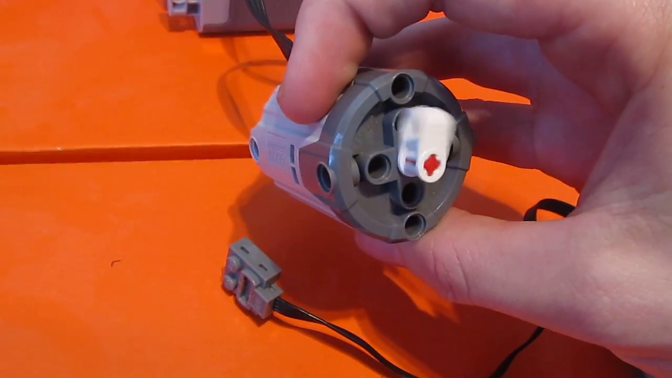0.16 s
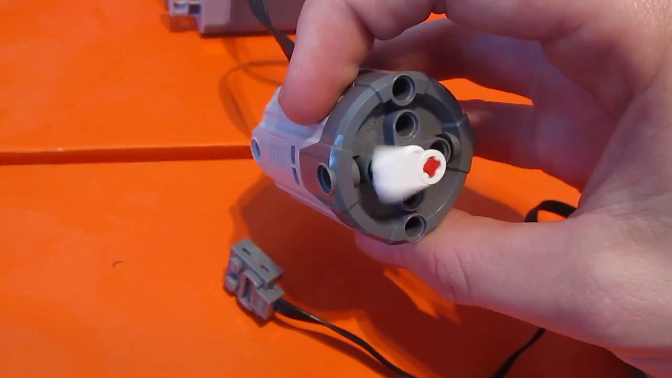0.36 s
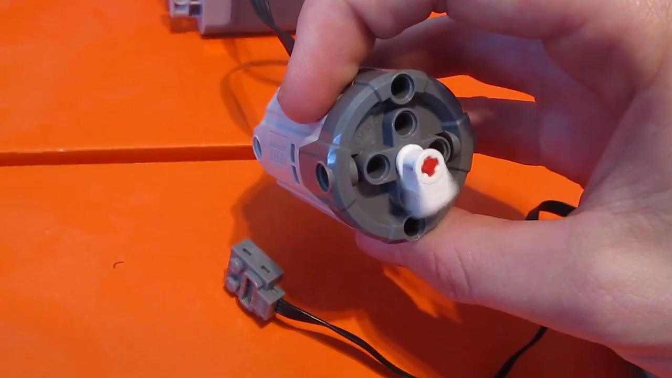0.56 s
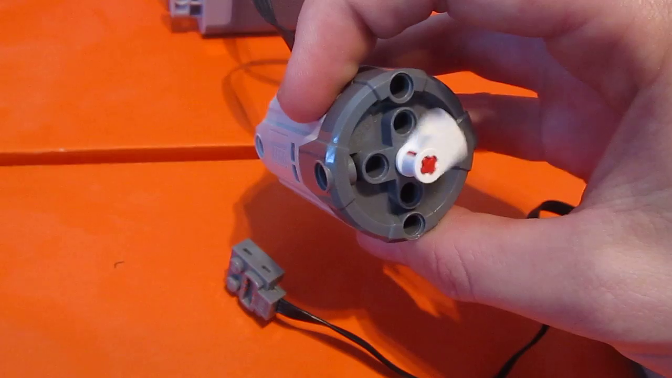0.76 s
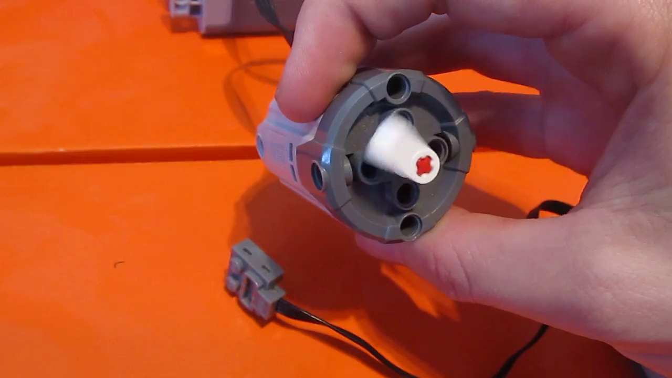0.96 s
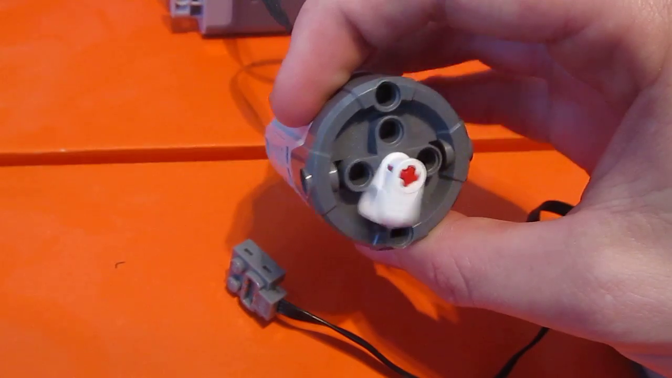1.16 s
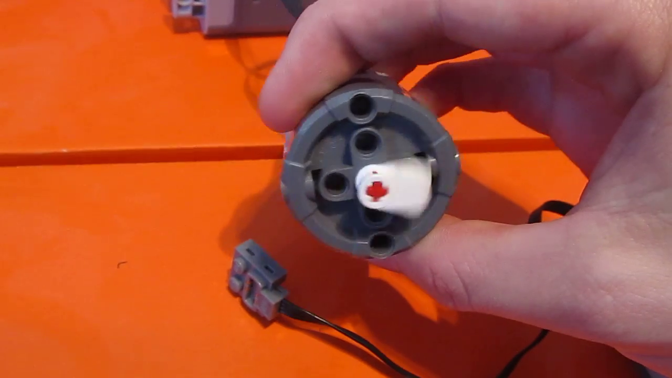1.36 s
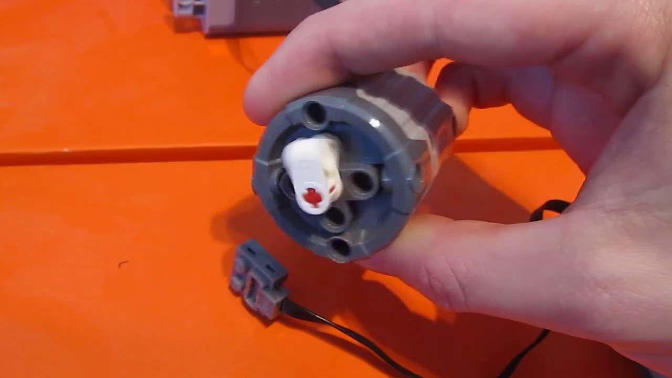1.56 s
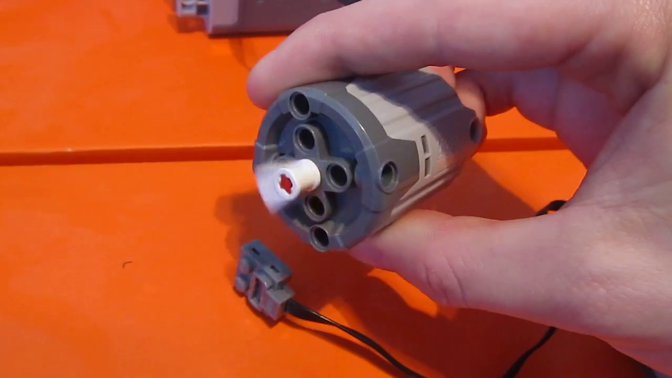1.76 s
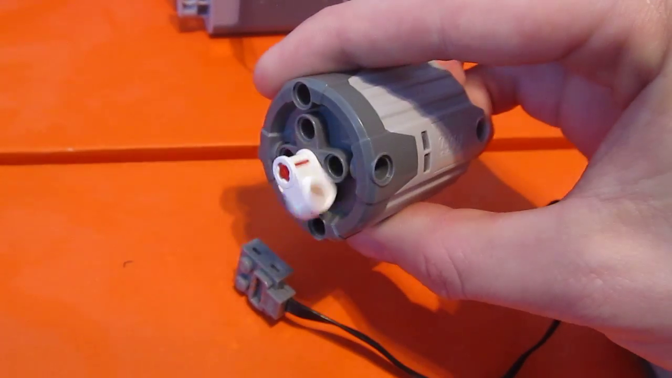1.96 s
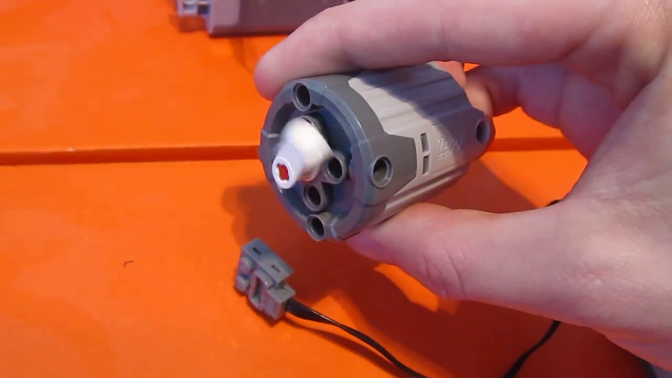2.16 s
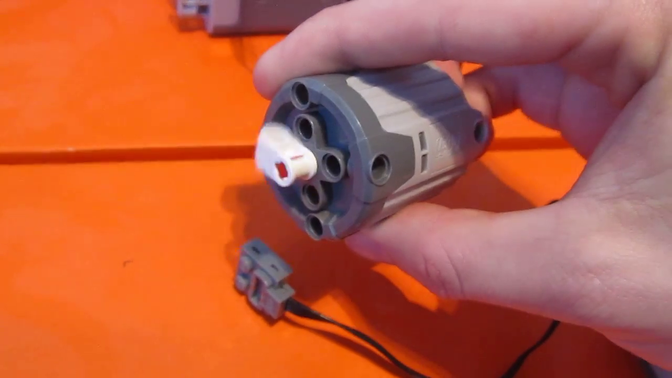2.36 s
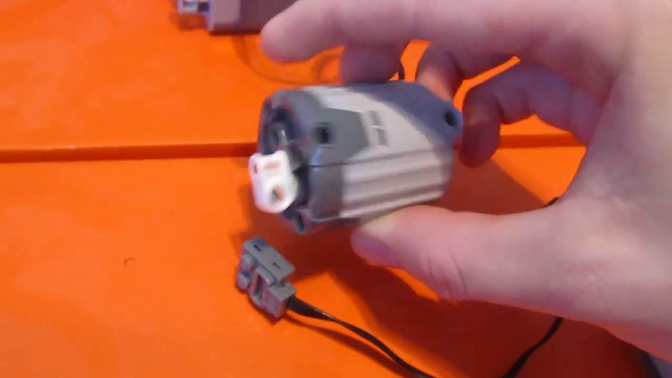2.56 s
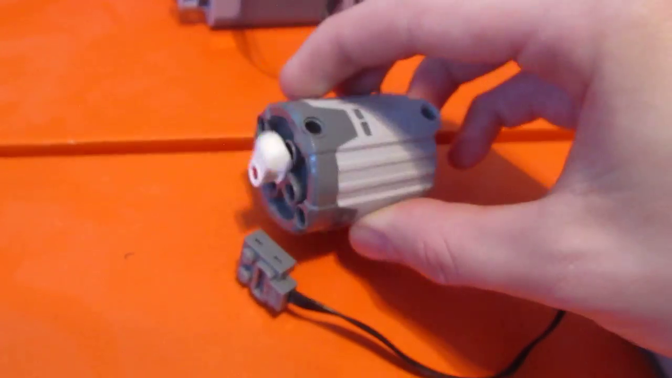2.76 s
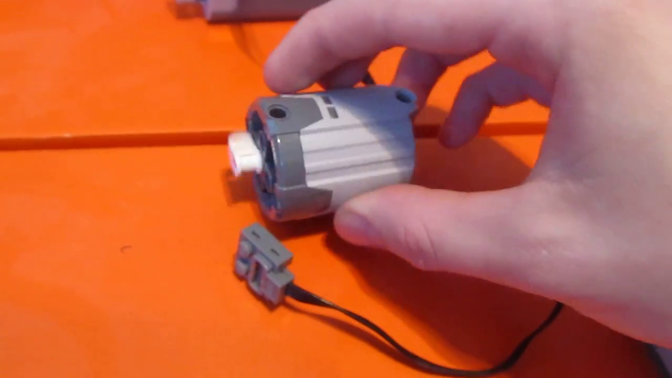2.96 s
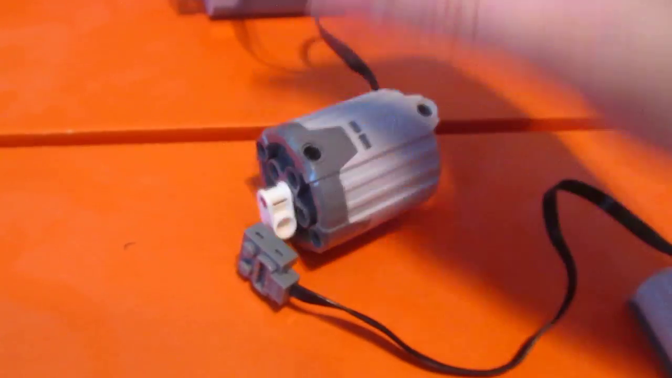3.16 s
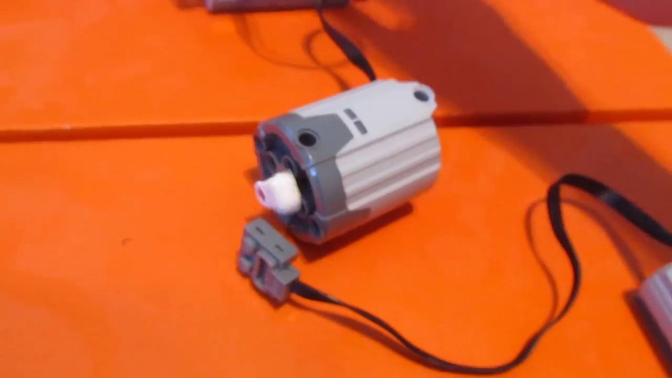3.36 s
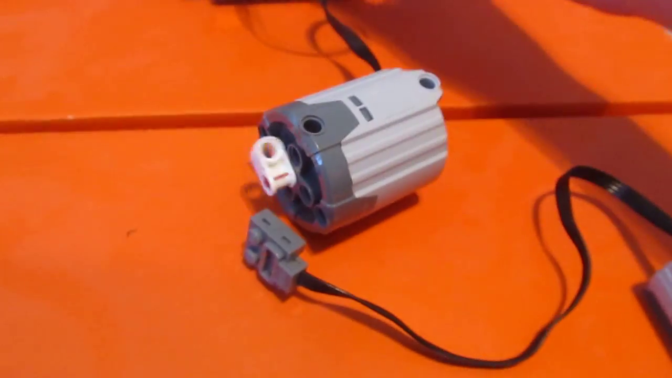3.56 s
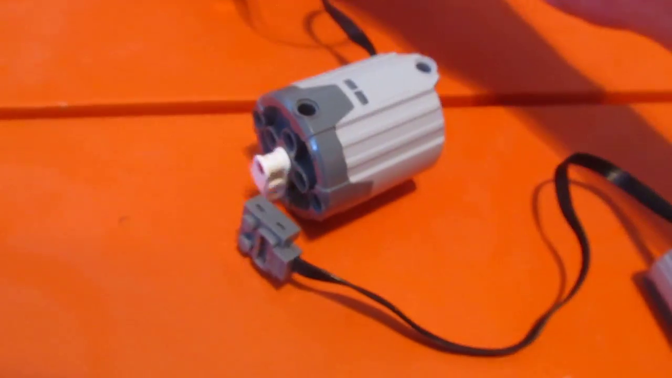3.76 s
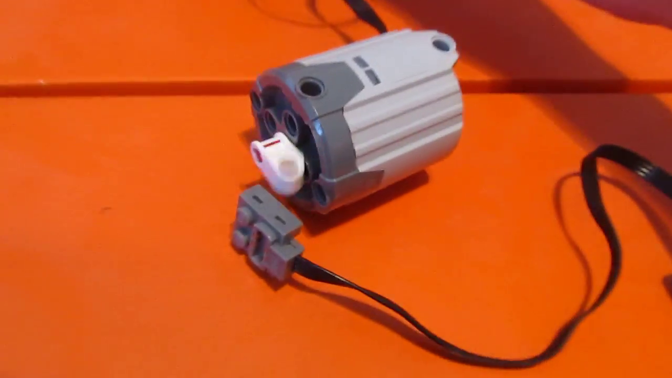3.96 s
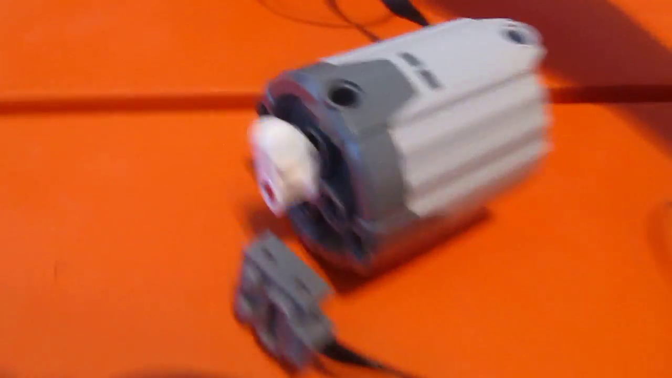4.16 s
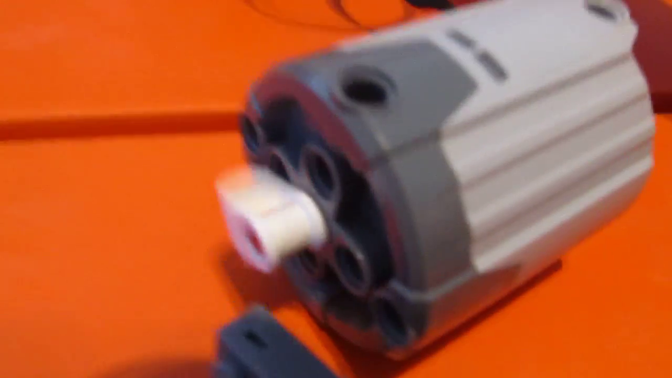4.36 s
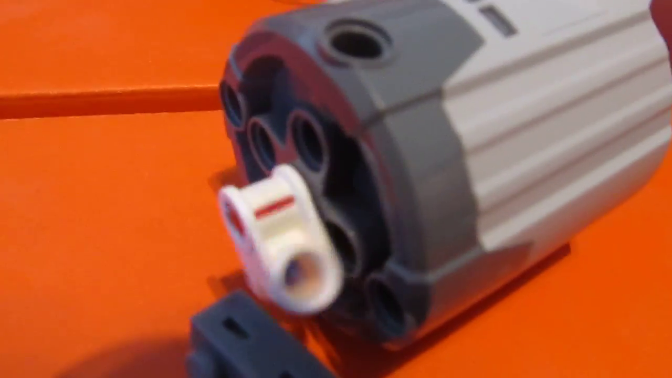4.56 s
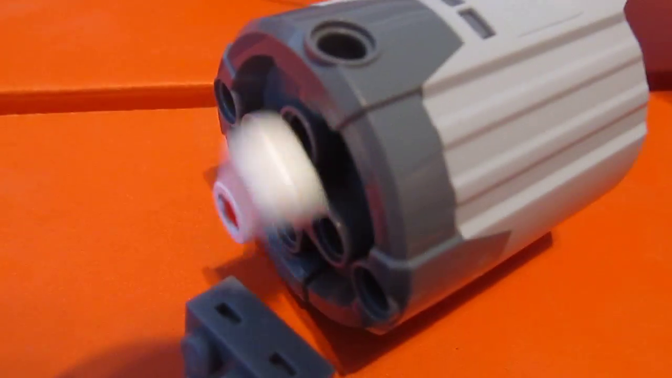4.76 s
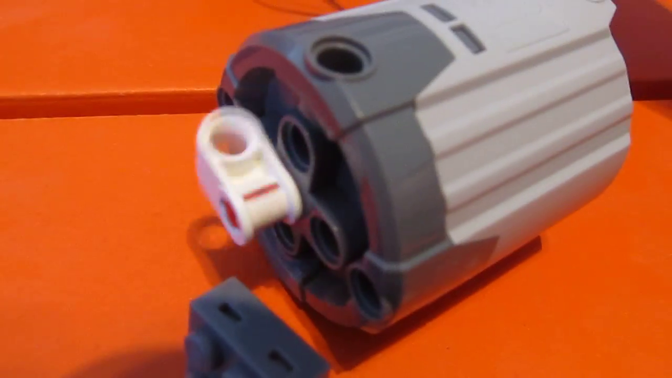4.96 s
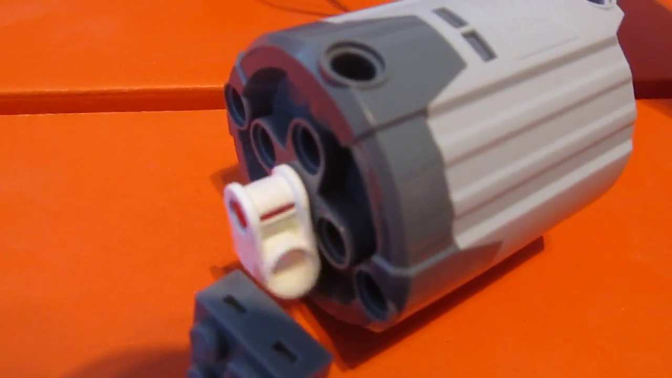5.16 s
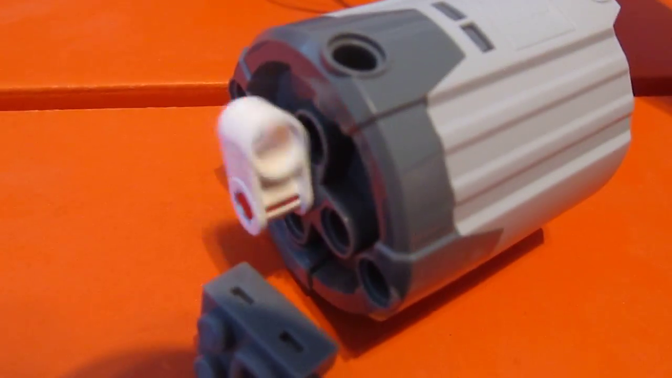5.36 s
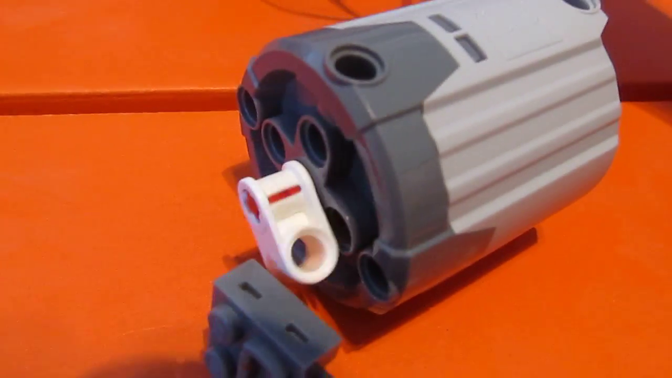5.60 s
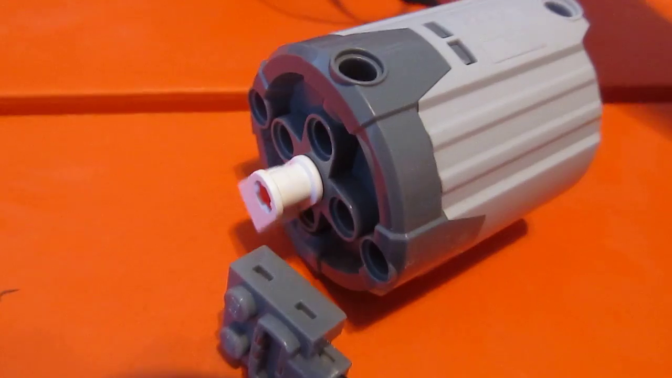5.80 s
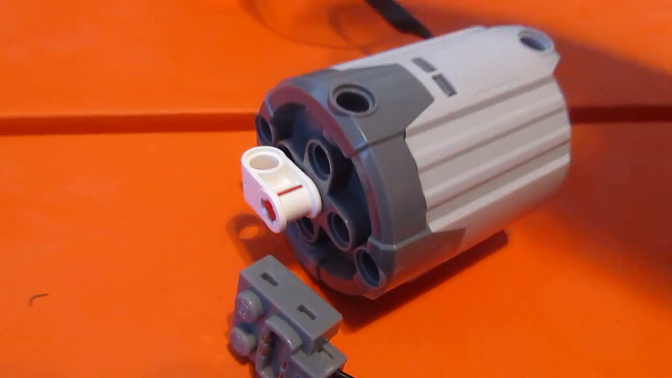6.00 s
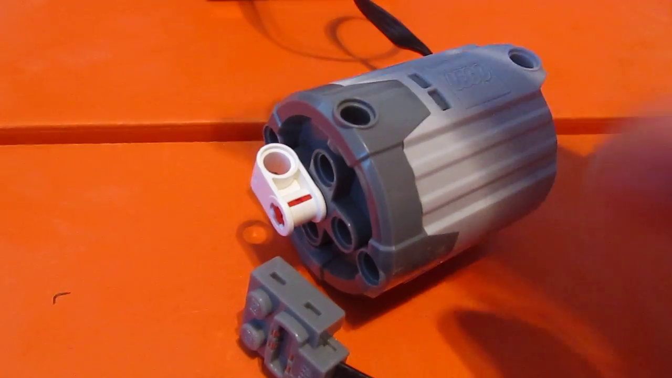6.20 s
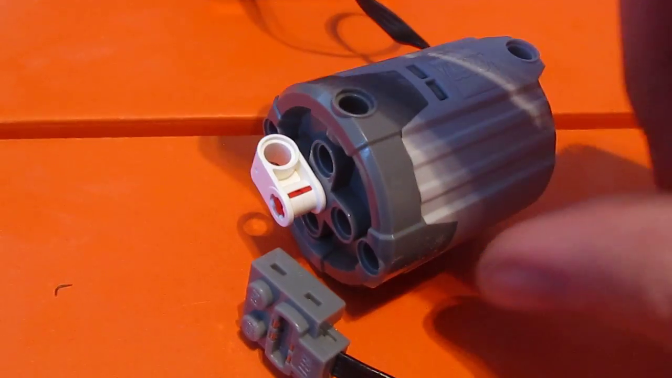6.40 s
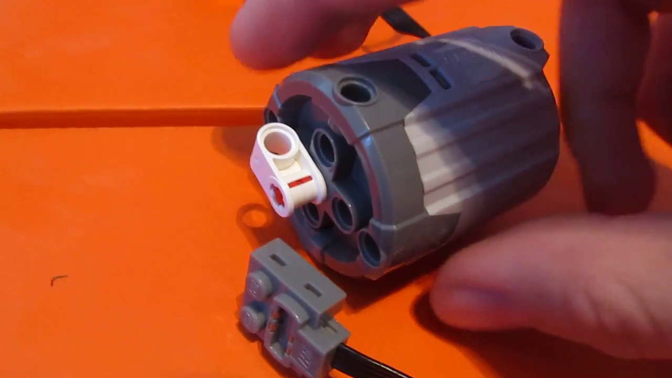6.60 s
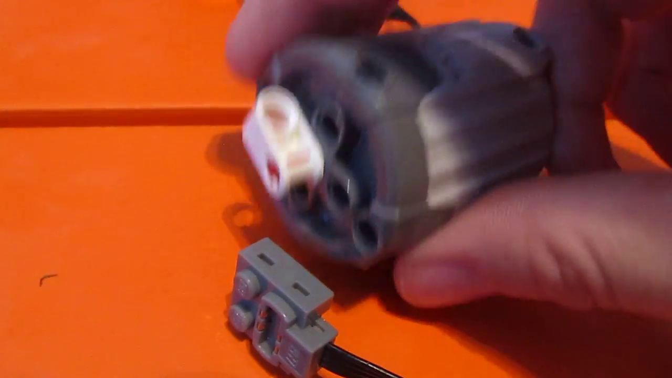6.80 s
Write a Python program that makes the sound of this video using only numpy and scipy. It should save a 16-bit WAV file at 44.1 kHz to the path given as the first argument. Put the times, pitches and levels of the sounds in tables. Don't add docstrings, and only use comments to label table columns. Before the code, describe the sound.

In a quiet room, a small plastic-cased motor whirs with a bright, grainy, fluttering gear rattle, its tone shifting as a hand turns it. It is set down with two hard hollow clunks on a plastic table, where a low hum joins the buzz. After about five seconds it slows, pitch falling into separate ticks, and stops. Soft finger brushes and taps follow. Close stereo microphones.

```python
import sys
import numpy as np
from scipy import signal
from scipy.fft import rfft, irfft, next_fast_len
from scipy.io import wavfile
from scipy.ndimage import uniform_filter1d

SR = 44100
rng = np.random.default_rng(int(sys.argv[2]) if len(sys.argv) > 2 else 0)


def linear_from_db(decibels):
    return 10 ** (np.asarray(decibels, float) / 20)


def dump(signal):
    limited = np.clip(np.atleast_2d(signal).T, -1, 1)
    pcm = np.round(limited * 32767).astype(np.int16)
    wavfile.write(sys.argv[1], SR, pcm)


N = 301644
TIME = np.arange(N) / SR
PAD = next_fast_len(N + SR // 4)
HZ = np.maximum(np.fft.rfftfreq(PAD, 1 / SR), 1)

FULL_HZ, STAGE = 127.2, 6
TOUCH_S, STALL_S = 3.1, 6.1

# (time [s], speed [turns per s])
COAST = [(5.034, 127.2), (5.094, 122.3), (5.114, 119.2), (5.264, 95.5), (5.328, 88.7), (5.492, 68.2),
         (5.638, 51.6), (5.818, 36.3), (5.9, 30.5), (6.3, 4), (6.4, 1)]
# (time [s], share [0-1], extra once-a-turn shake [dB])
CONTACT = [(2.86, 0, 15), (2.91, 0.36, 21), (3.03, 0.48, 24), (3.07, 0.52, 2), (3.25, 0.59, 5), (4.2, 1, 0),
           (5.03, 0.92, 3.5), (5.15, 0.92, 0)]
# (frequency [Hz], width [Hz], level [dB])
RESTING = ([(35, -62), (60, -26.5), (253, -13), (320, -12), (376, -12), (413, -9.5), (810, -10), (2200, -6),
            (5200, -2), (10700, 10), (15500, -16)], [(259, 35, -5), (500, 91, -10.5), (1570, 113, -9.5),
            (2255, 320, -2.5), (3770, 690, 5), (6225, 640, 8.5), (7350, 990, 6.5), (10300, 1600, -19),
            (12400, 1500, -7)])
# (frequency [Hz], left lead [rad])
HAND = ([(60, -1), (150, -5), (380, -1.5), (950, 1.5), (2380, -2.5), (5980, 3.5), (15000, -13.5)],
         [(300, -1.44), (1600, 0.47), (2300, -0.6), (4300, -0.52), (7000, -1.54), (11000, -1.28),
         (15000, -1.4)])
# (frequency [Hz], left lead [rad])
DOWN = ([(60, 3), (150, 2.5), (380, -1), (950, 0.5), (2380, -2.5), (5980, -1.5), (15000, -2.5)],
         [(300, 0.14), (1600, -0.56), (2300, -0.29), (4300, -0.71), (7000, -0.38), (11000, -0.93),
         (15000, -1.1)])


def in_time(rows):
    s, *columns = np.transpose(rows)
    return [np.interp(TIME, s, column) for column in columns]


def at_hz(points, hz=HZ):
    point_hz, value = np.array(points)[:, 0], np.array(points)[:, 1]
    return np.interp(np.log(hz), np.log(np.maximum(point_hz, 1)), value)


def drift(rate):
    knots = rng.standard_normal(2000)
    return np.interp(np.arange(N) * rate / SR % 1999, np.arange(2000), knots) * 1.22


def swell(middle, length):
    return np.cos(np.pi * np.clip((TIME - middle) / length, -.5, .5)) ** 2


def impulses(events, extra_db):
    clicks = np.zeros(N)
    clicks[[round(s * SR) for s, db in events]] = linear_from_db(np.array(events)[:, 1] + extra_db)
    return clicks


def body(shape):
    smooth, peaks = shape
    power = linear_from_db(at_hz(smooth) - 2) ** 2
    for centre_hz, width_hz, db in peaks:
        power = power + linear_from_db(db) ** 2 / (1 + (2 * (HZ - centre_hz) / width_hz) ** 2) ** 2
    return np.sqrt(power)


def causal(gain):
    cepstrum = irfft(np.log(gain + 1e-6), PAD)
    cepstrum[1:PAD // 2] *= 2
    cepstrum[PAD // 2 + 1:] = 0
    return np.exp(rfft(cepstrum)) / np.sqrt(np.mean(gain ** 2))


def ports(direct, diffuse, place):
    # (frequency [Hz], left-right likeness [0-1])
    likeness = [(60, 0.3), (180, 0.93), (550, 0.98), (1650, 0.94), (3200, 0.98), (5000, 0.65), (8000, 0.78),
                (15000, 0.36)]
    alike = np.clip(at_hz(likeness), 0, 1)
    turn = linear_from_db(at_hz(place[0]) / 2) * np.exp(.5j * at_hz(place[1]))
    shared = np.sqrt((1 + alike) / 2) * direct
    apart = np.sqrt((1 - alike) / 2) * diffuse
    return irfft(np.array([(shared + apart) * turn, (shared - apart) / turn]), PAD)[:, :N]


def hiss(place, *layers):
    spectra = 0
    for envelope, shape in layers:
        noise = rng.standard_normal((2, N)) * envelope
        spectra = spectra + rfft(noise, PAD) * causal(body(shape))
    return ports(*spectra, place)


def ring(clicks, hz, t60):
    r, w = linear_from_db(-60 / (t60 * SR)), 2 * np.pi * hz / SR
    return signal.lfilter([0, np.sin(w)], [1, -2 * r * np.cos(w), r * r], clicks + 1e-18)


def recorder_gain():
    # (time [s], dip [dB])
    dips = [
        (2.863, -5.5),
        (3.199, -6.5),
    ]
    recover_s = 0.16
    return linear_from_db(sum(db * (TIME > s) * np.exp(-np.maximum(TIME - s, 0) / recover_s) for s, db in dips))


def rotor():
    speed = in_time(COAST)[0]
    speed = np.where(np.arange(N) < COAST[0][0] * SR, FULL_HZ, speed)
    return speed, np.cumsum(speed) / SR


def teeth(speed, per_turn, spread_db, ring_s, steady):
    hit = rng.random(N) < per_turn * speed / SR
    force = np.minimum(rng.exponential(1, N), 2.5)
    sizes = hit * linear_from_db(2 * spread_db * force)
    bursts = signal.lfilter([1], [1, -np.exp(-2 / (ring_s * SR))], sizes + 1e-18)
    rub = steady * (0.62 + 0.39 * speed / FULL_HZ)
    mean = uniform_filter1d(bursts, size=SR // 8) + 1e-9
    return np.sqrt(rub + np.maximum(1 - rub, 0) * bursts / mean)


def throb(pose, zone, turns):
    throb_hand = [(1, 0.2, 0.18, 0.044, 0.22), (2, 0.1, .02, 0.033, 0.052), (3, 0.33, 0.06, 0.18, 0.048),
                  (5, 0, .02, 0.043, 0.029), (6, 0.02, 0.14, 0.15, 0.033), (18, 0.06, 0.1, 0.072, 0.063)]
    throb_table = [(1, 0.019, 0.026, .07, 0.085), (3, 0.036, 0.016, .03, 0.13),
                   (6, 0.064, 0.25, 0.024, 0.039), (12, 0.13, 0.22, 0.052, .05),
                   (18, 0.055, 0.36, 0.56, 0.15)]
    carrier_start = [
        (-.38, -0.376, -0.425, -0.348),
        (-.1, -.42, -0.0847, -0.498),
    ]
    carrier = ((turns / STAGE + carrier_start[pose][zone]) % 1).astype(np.float32)
    swing = 0
    for row in (throb_hand, throb_table)[pose]:
        swing = swing + row[1 + zone] * np.cos(np.float32(2 * np.pi * row[0]) * carrier)
    return np.maximum(1 + 1.31 * swing, .05)


def rattle(speed, turns):
    zones_hz = [1300, 2900, 5200]
    # (facing level [dB], turned level [dB], resting level [dB], power of speed, loss after stall [dB per s])
    zones = [
        (-28, -27.5, -32.5, 0.22, 51),
        (-10.5, -9, -9, 1.1, 110),
        (-8, -13, -3, 1, 160),
        (-0.56, -0.2, -0.83, 1.12, 260),
    ]
    table_adds_db = [-12, -8.5, -32, -18]
    grip = [0.52, 1.54, 1.05, 0.89]
    # (time [s], share facing [0-1], share turned [0-1], share on the table [0-1])
    poses = [
        (0, 0.92, 0.013, 0),
        (1.2, 0.94, 0.23, 0.00024),
        (1.6, 0.057, 0.71, 0.015),
        (2.57, 0.0044, 0.84, 0.038),
        (2.65, 0.13, 0.071, 0.33),
        (2.85, 0.02, 0.017, 0.67),
    ]
    # (time [s], level [dB])
    nearness = [(0, -25), (1.35, -26), (1.65, -23.5), (2.1, -23), (2.55, -22), (2.68, -21.5), (2.82, -21),
                (3.13, -22.5), (3.5, -23), (4.25, -22.5), (4.6, -23), (5.1, -23.5), (5.5, -21.5),
                (5.85, -24.5), (6.1, -26)]
    # (frequency [Hz], width [Hz], level [dB])
    facing = ([(35, -78), (60, -46), (351, -42), (910, -22), (1070, -23.5), (2200, 0), (2910, -25),
               (5200, -26), (6870, 2), (10900, -1.5), (15500, -29)], [(2362, 420, 4.5), (3600, 800, -6),
               (4420, 1140, -8), (5750, 310, -0.5), (7140, 1020, 5.5), (8850, 400, -19.5),
               (11500, 760, -1.5), (12440, 1900, -6)])
    # (frequency [Hz], width [Hz], level [dB])
    turned = ([(35, -67), (60, -19), (423, -23), (869, -8.5), (1200, -15), (2100, 1), (4030, -17.5),
               (5080, -10.5), (6710, 0.5), (10900, -3), (15500, -28)], [(2180, 250, -2), (4060, 380, -4),
               (6650, 960, 2), (8050, 400, -2), (10700, 520, 0), (12400, 1400, -12)])
    graininess = [0.57, 0.5, 0.096, 1.0]
    stop_s = 6.34

    shares = np.sqrt(np.clip(in_time(poses), 0, 1))
    touch = np.maximum(in_time(CONTACT)[0], 0)
    near, dip = linear_from_db(in_time(nearness)[0]), recorder_gain()
    crank = 1 + 0.02 * np.cos(2 * np.pi * (turns / STAGE ** 2 + 0.12))
    contacts = teeth(speed, per_turn=8., spread_db=1.5, ring_s=0.0006, steady=0.36)
    above = [np.ones_like(HZ)] + [1 / (1 + (edge / HZ) ** 16) for edge in zones_hz] + [0 * HZ]
    bodies = [body(shape) for shape in (facing, turned, RESTING)]
    sums = np.zeros((2, 2, len(HZ)), complex)
    for zone, (*pose_db, power, stall_db) in enumerate(zones):
        fade_db = stall_db * np.maximum(TIME - STALL_S, 0)
        loose = linear_from_db(0.55 * drift(24.92) + 0.11 * drift(7) - fade_db)
        grain = contacts ** (graininess[zone] * (0.61 + .4 * speed / FULL_HZ))
        noise = rng.standard_normal((2, N)) * near * crank * dip ** grip[zone]
        noise = noise * (speed / FULL_HZ) ** power * grain * loose
        beats = [throb(0, zone, turns), throb(1, zone, turns)]
        levels = [linear_from_db(pose_db[0]), linear_from_db(pose_db[1]), linear_from_db(pose_db[2]) + touch * linear_from_db(table_adds_db[zone])]
        band = np.sqrt(np.maximum(above[zone] - above[zone + 1], 0))
        for pose in range(3):
            gain = bodies[pose] * band
            played = (noise * (beats[pose // 2] * shares[pose] * levels[pose])).astype(np.float32)
            sums[pose // 2] += rfft(played, PAD) * (gain / np.sqrt(np.mean(gain ** 2)))
    return (ports(*sums[0], HAND) + ports(*sums[1], DOWN)) * np.clip((stop_s - TIME) / 0.037, 0, 1)


def hum(speed, turns):
    # (multiple of rotor speed, level in the hand [dB], level on the table [dB])
    order_db = [(1, -87, -53.5), (2, -101, -61), (3, -80, -41), (4, -77, -46), (5, -67.5, -50),
                (6, -91, -42.5), (7, -64, -47.5), (9, -60, -43.5), (10, -56.5, -84), (11, -58.5, -44.5),
                (12, -62, -45), (13, -57.5, -47.5), (15, -65, -67), (17, -46.5, -57)]
    # (multiple of rotor speed, level [dB])
    poles = [(1, -63), (3, -47), (6, -42.5), (7, -52), (9, -43), (10, -44.5), (12, -46), (13, -49),
             (15, -41)]
    # (frequency [Hz], level [dB])
    slide_db = [(150, -8), (255, 3), (330, -4), (440, 0.5), (620, 4.5), (710, -7), (870, -4), (1300, -3)]
    share, unbalance_db = in_time(CONTACT)
    out, table = np.zeros(N), body(RESTING)
    relative = speed / FULL_HZ
    unpowered = np.clip(7.1 * (1 - relative), 0, 1)
    for k, hand_db, table_db in order_db:
        slide = table[(k * speed * PAD / SR).astype(int)] / np.interp(k * FULL_HZ, HZ, table)
        pole_db = dict(poles).get(k, table_db - 12.0)
        coast_db = unpowered * (pole_db - table_db + at_hz(slide_db, k * speed))
        shake_db = unbalance_db * ((k == 1) + 0.22 * (k == 3))
        dying = relative ** .5 * np.minimum(speed / 55, 1) ** 2
        on_table = np.maximum(share, 0) * dying * linear_from_db(table_db + shake_db + coast_db) * slide ** .5
        size = linear_from_db(hand_db) * relative + on_table
        wander = 0.051 * k * (1 - 0.78 * unpowered) * drift(9) + 2 * np.pi * rng.random()
        flutter = linear_from_db((2.0 + 1.5 * unpowered) * drift(14))
        out += np.sqrt(2) * size * flutter * np.sin(2 * np.pi * k * turns + wander)
    return out


def room():
    # (frequency [Hz], width [Hz], level [dB])
    room_shape = ([(15, -73), (25, -42), (53, -28), (93, -3), (144, -8), (198, -9), (349, -5), (582, -13.5),
                   (6210, -20.5), (12200, -40), (15500, -51)], [(1860, 190, -13), (6230, 500, -23),
                   (11160, 1900, -27)])
    quiet_s, rise_s = 5.77, 0.33
    rise_db = 15 * (1 - np.exp(-np.maximum(TIME - quiet_s, 0) / rise_s))
    return hiss(HAND, (linear_from_db(-65 + rise_db), room_shape))


def planets(turns):
    # (time [s], peak level [dB])
    loud_knocks = [(0.017, -46), (0.049, -40), (0.063, -38), (0.217, -38), (0.331, -40), (0.347, -37),
                   (0.394, -38), (0.424, -35), (0.583, -44), (0.615, -38), (0.629, -36), (0.676, -38),
                   (0.724, -35), (0.818, -39), (0.851, -35), (0.898, -35), (0.912, -34), (0.975, -47),
                   (0.991, -36), (1.038, -33), (1.084, -38), (1.18, -40), (1.196, -34.5), (1.276, -40),
                   (1.291, -32), (1.322, -33), (1.368, -41), (1.433, -41), (1.465, -36), (1.479, -37),
                   (1.51, -43), (1.54, -39), (1.559, -32), (1.685, -41), (1.729, -39), (1.793, -40),
                   (1.841, -46), (1.856, -34), (1.871, -34), (1.983, -42), (2.013, -39), (2.031, -48),
                   (2.045, -40), (2.077, -37), (2.123, -38), (2.154, -32), (2.172, -34), (2.249, -37),
                   (2.327, -46), (2.342, -40), (2.36, -34), (2.374, -36), (2.422, -39), (2.454, -39),
                   (2.516, -34), (2.706, -36), (2.753, -37)]
    passes = np.floor(turns * 3 / STAGE - .08 + 0.024 * drift(60))
    passed = np.diff(np.maximum.accumulate(passes), prepend=passes[0]) > 0
    shaft = 2 * np.pi * turns / STAGE ** 2
    pattern_db = 3.6 * np.cos(3 * (shaft - 1.33)) + 1.3 * np.cos(shaft - 1.6) + 0.84 * drift(70)
    knocks = passed * linear_from_db(-43.5 + pattern_db) * (TIME < TOUCH_S)
    knocks = knocks + impulses(loud_knocks, extra_db=2)
    return ring(knocks, 630, 0.012) - 1.3 * ring(knocks, 874, 0.011)


def snaps():
    # (time [s], peak level [dB])
    snap_events = [(0.189, -9), (0.2823, -17), (0.3301, -17), (0.6035, -16), (0.6484, -16), (0.8036, -6),
                   (1.038, -13), (1.0854, -11), (1.275, -15), (1.3703, -16), (1.461, -9), (1.5194, -13),
                   (1.5579, -17), (1.6571, -19), (1.7085, -12), (1.751, -7), (1.7908, -10), (2.0343, -7),
                   (2.1226, -12), (2.359, -10), (2.452, -5), (2.5461, -7), (2.6005, -14), (2.648, -8),
                   (2.7048, -5), (2.7367, -11)]
    # (frequency [Hz], width [Hz], level [dB])
    tooth_shape = ([(3000, -40), (6000, -15), (9000, 1), (12000, -3), (15500, -22)], [(10800, 1200, 2.5)])
    ring_s = 0.0017
    clicks = impulses(snap_events, extra_db=-4.5)
    bursts = signal.lfilter([1], [1, -np.exp(-1 / (ring_s * SR))], clicks + 1e-18)
    return hiss(HAND, (bursts, tooth_shape))


def sweeps(turns):
    # (middle time [s], length [s], frequency [Hz], width [Hz], level [dB])
    passing = [(1.58, 0.29, 7500, 600, -29), (1.59, 0.17, 10000, 833.3, -29), (1.56, .25, 8150, 500, -33),
               (1.86, 0.58, 6100, 500, -40), (2.16, 1, 4070, 270, -36), (2.4, .45, 10900, 530, -32),
               (2.3, .4, 8200, 500, -29), (2.3, .5, 12600, 1200, -38), (2.71, .25, 11600, 900, -29),
               (2.74, 0.33, 7350, 450, -26), (2.79, 0.17, 6050, 400, -26), (2.453, 0.61, 2460, 324, -36.5),
               (2.757, 0.23, 2440, 540, -31), (3.14, 0.092, 4160, 600, -25), (3.3, 0.94, 12000, 1200, -43),
               (4.12, .5, 11700, 900, -33), (4.9, 1, 10000, 1500, -34)]
    noise, spectra = rng.standard_normal((2, N)) * throb(0, 3, turns), 0
    for middle, length, centre_hz, width_hz, db in passing:
        gain = 1 / (1 + (2 * (HZ - centre_hz) / width_hz) ** 2)
        played = (noise * swell(middle, length) * linear_from_db(db)).astype(np.float32)
        spectra = spectra + rfft(played, PAD) * gain / np.sqrt(np.mean(gain ** 2))
    return ports(*spectra, HAND)


def blows():
    # (time [s], peak level [dB], contact cut-off [Hz])
    blow_events = [(2.8266, -9, 1400), (2.832, -17, 1200), (2.8509, -0.5, 3460), (2.859, -7, 1700),
                   (2.872, -7.5, 1100), (2.885, -20, 900), (2.905, -26, 700), (3.04, -22, 503),
                   (3.1452, -5.5, 1540), (3.147, -2.5, 1474), (3.156, -6, 1000), (3.175, -24, 1000),
                   (3.1945, 1, 2840), (3.205, -3.5, 1520), (3.222, -10, 900), (3.235, -18, 800),
                   (6.61, -39, 600), (6.6556, -29, 2000), (6.666, -33, 900), (6.78, -31, 1400),
                   (6.789, -37, 1400), (6.797, -32, 1500), (6.803, -33, 2500), (6.809, -25, 2400),
                   (6.819, -44, 1200)]
    # (frequency [Hz], level [dB], 60 dB decay [s])
    table_modes = [(159.6, -9.5, 0.1), (253, -2, 0.048), (344, -4, 0.091), (415, -3, 0.1),
                   (582, -2.5, 0.037), (690, -3.5, 0.036), (878, -6.5, 0.045), (1000, -3.5, 0.041),
                   (1167, -2.5, 0.024), (1290, -6, 0.04), (1660, -7, 0.022), (1960, -18, 0.082)]
    hand_on_s, hand_damps = 6.5, 0.43
    length = SR // 5
    out, spread = np.zeros(N), rng.normal(0, 2.5, (len(blow_events), len(table_modes)))
    for (s, db, cut_hz), own_db in zip(blow_events, spread):
        bare = 0.32 * (cut_hz / 1000) ** 1.7
        soften = signal.bessel(3, cut_hz, fs=SR, output="sos", norm="mag")
        pulse = signal.sosfilt(soften, np.eye(1, length)[0])
        damping = hand_damps if s > hand_on_s else 1
        modes = 0
        for k, (hz, mode_db, t60) in enumerate(table_modes):
            modes = modes + (-1) ** k * linear_from_db(mode_db + own_db[k] - 10.0) * ring(pulse, hz, t60 * damping)
        start = round(s * SR)
        out[start:start + length] += (linear_from_db(db) * (bare * pulse / pulse.max() + modes))[:N - start]
    return signal.sosfilt(signal.butter(4, 115, "high", fs=SR, output="sos"), out)


def seam(turns):
    # (frequency [Hz], width [Hz], level [dB])
    seam_shape = ([(5000, -60), (7300, -40), (10000, -60)], [(7350, 670, 0)])
    ends_s, sharpness = 4.55, 3.3
    load = np.abs(np.cos(np.pi * (turns / STAGE ** 2 - 0.16))) ** sharpness
    heard = (TIME > TOUCH_S) * np.clip((ends_s - TIME) / .5, 0, 1)
    return hiss(DOWN, (linear_from_db(-26.5) * load * heard * recorder_gain(), seam_shape))


def ticks():
    # (time [s], bright level [dB], dull level [dB])
    tick_events = [(5.486, -7, -26), (5.593, -13, -29), (5.6272, -12, -24), (5.708, -19, -26),
                   (5.7127, -9.5, -33), (5.7605, -12.5, -40), (5.767, -16, -40), (5.8116, -20, -38),
                   (5.853, -17, -40), (5.856, -20, -40), (5.876, -19, -36), (5.8834, -25, -30),
                   (5.9227, -12, -26), (5.934, -16, -29), (5.944, -15, -26), (5.959, -22, -49),
                   (5.9985, -25, -29.5), (6.0664, -24, -35), (6.0733, -19, -33), (6.0994, -28, -31),
                   (6.1086, -27, -37), (6.138, -37, -42), (6.1556, -38, -34), (6.1888, -32.5, -36),
                   (6.2166, -43, -32.5), (6.233, -33, -32), (6.2743, -50, -41), (6.3074, -55, -43),
                   (6.5507, -28, -49), (6.5617, -34, -44)]
    # (start [s], length [s], level [dB])
    catches = [
        (5.921, 0.041, -33.5),
        (6.062, 0.048, -50.5),
        (3.14, 0.022, -21.5),
    ]
    # (frequency [Hz], width [Hz], level [dB])
    bright_shape = ([(2500, -49.5), (5000, -3.5), (8000, 3.5), (12000, -3), (15500, -29)], [(6423, 1000, 4),
                     (10500, 1300, -1.5)])
    # (frequency [Hz], width [Hz], level [dB])
    dull_shape = ([(150, -30), (500, 6), (1200, -2), (2800, -8), (5000, -12), (9000, -47)],
                   [(1700, 640, 3.5), (3650, 170, 1)])
    ring_s = 0.0014
    bright, dull = np.zeros(N), np.zeros(N)
    decay = np.exp(-np.arange(800) / SR / ring_s)
    for s, bright_db, dull_db in tick_events:
        start = round(s * SR)
        bright[start:start + 800] += linear_from_db(bright_db - 5.0) * decay
        dull[start:start + 800] += linear_from_db(dull_db + 1.5) * decay
    for s, length, db in catches:
        caught = (TIME > s) & (TIME < s + length)
        bright += linear_from_db(db) * caught
        dull += linear_from_db(db - 1.0) * caught
    return hiss(DOWN, (bright, bright_shape), (dull, dull_shape))


def cap(speed):
    # (frequency [Hz], width [Hz], level [dB])
    cap_shape = ([(2000, -52), (3700, -33), (6000, -46)], [(3825, 400, 0.0045)])
    rise_s = 0.31
    freed = np.clip((TIME - COAST[0][0]) / rise_s, 0, 1) * (speed / FULL_HZ) ** 1.37
    level = linear_from_db(-24.5 - 330 * np.maximum(TIME - STALL_S, 0))
    contacts = teeth(speed, per_turn=5.8, spread_db=1.0, ring_s=0.0011, steady=0.13)
    return hiss(DOWN, (level * freed * contacts, cap_shape))


def jolts():
    # (time [s], peak level [dB])
    jolt_events = [(5.469, -50), (5.741, -34), (5.92, -31), (5.934, -32), (6.071, -41), (6.1, -38),
                   (6.19, -49), (6.231, -50)]
    pushes = impulses(jolt_events, extra_db=0)
    return ring(pushes, 250.4, 0.16) - 0.8 * ring(pushes, 502.3, 0.11) + 0.46 * ring(pushes, 1080, 0.11)


def brushing():
    # (start [s], hold [s], level of the rub [dB], level of the singing shell [dB])
    strokes = [(6.553, .012, -45.5, -54), (6.588, 0.016, -46, -41.5), (6.618, 0.019, -58, -61),
               (6.654, .02, -52, -56), (6.675, 0.054, -49, -66), (6.78, .012, -58, -66),
               (6.796, 0.01, -52, -47)]
    # (frequency [Hz], width [Hz], level [dB])
    skin_shape = ([(25, -8), (60, -23), (200, -21), (600, 0), (1400, -11), (3500, -4.5), (7500, -15),
                   (15500, -28)], [(3000, 900, -14)])
    # (frequency [Hz], width [Hz], level [dB])
    shell_shape = ([(800, -41), (1900, -20), (4300, -26), (8000, -48)], [(1890, 240, 3.5), (4220, 300, -6)])
    rise_s, fall_db_per_s = .008, 380
    rub, sing = np.zeros(N), np.zeros(N)
    for s, hold, rub_db, sing_db in strokes:
        rise = np.clip((TIME - s) / rise_s, 0, 1)
        stroke = rise * linear_from_db(-fall_db_per_s * np.maximum(TIME - s - hold, 0))
        rub += linear_from_db(rub_db) * stroke
        sing += linear_from_db(sing_db) * stroke
    grain = linear_from_db(1.8 * drift(400))
    return hiss(DOWN, (rub * grain, skin_shape), (sing * grain, shell_shape))


def pressing():
    # (middle time [s], length [s], level [dB])
    presses = [
        (6.612, .04, -56),
        (6.68, .09, -54),
        (6.795, .05, -54),
    ]
    # (frequency [Hz], width [Hz], level [dB])
    thump_shape = ([(15, -13), (35, -3), (90, -2), (200, -12), (500, -45)], [(60, 40, -10)])
    push = sum(linear_from_db(db) * swell(middle, length) for middle, length, db in presses)
    return hiss(DOWN, (push, thump_shape))


def scene():
    speed, turns = rotor()
    tones = hum(speed, turns) * recorder_gain() + planets(turns) + blows() + jolts()
    motor = rattle(speed, turns) + snaps() + sweeps(turns) + seam(turns) + ticks() + cap(speed)
    return motor + ports(rfft(tones, PAD), 0, DOWN) + brushing() + pressing() + room()


def band_limit(x):
    return signal.sosfilt(signal.butter(12, 15730, fs=SR, output="sos"), x)


def record(dry):
    notched = signal.lfilter(*signal.iirnotch(7880, 60, fs=SR), dry)
    top_cut = signal.ellip(10, .3, 70, 15650, fs=SR, output="sos")
    mix = signal.sosfilt(top_cut, np.clip(notched, -1, 1))
    return band_limit(mix)


dry = scene()
out = record(dry)
dump(out)
```